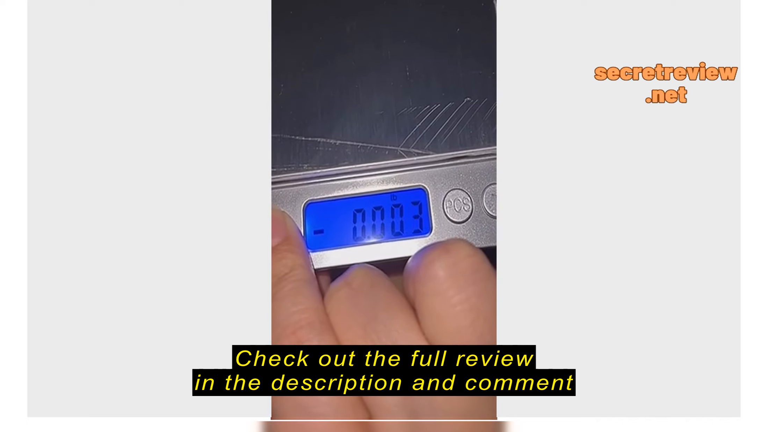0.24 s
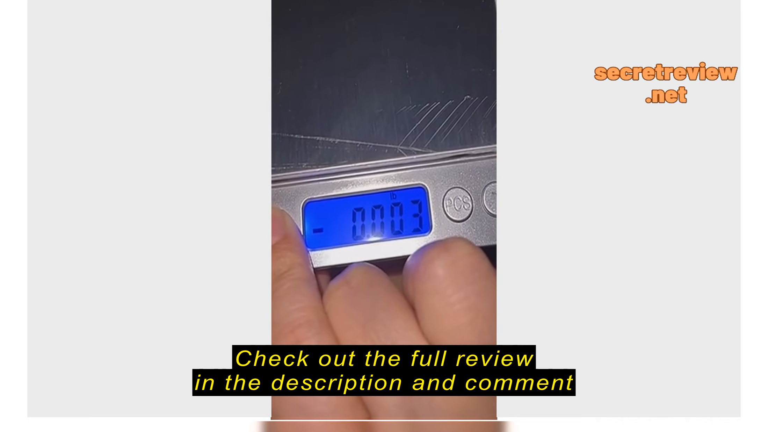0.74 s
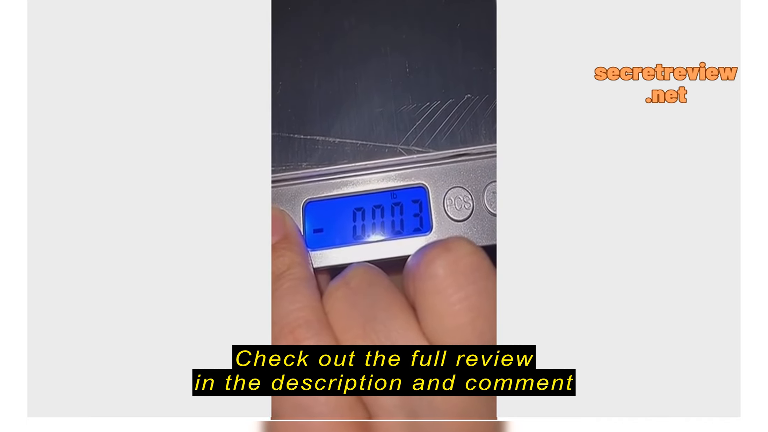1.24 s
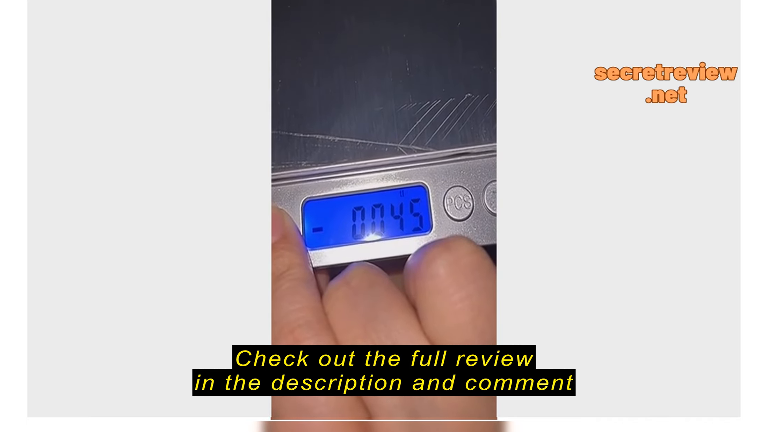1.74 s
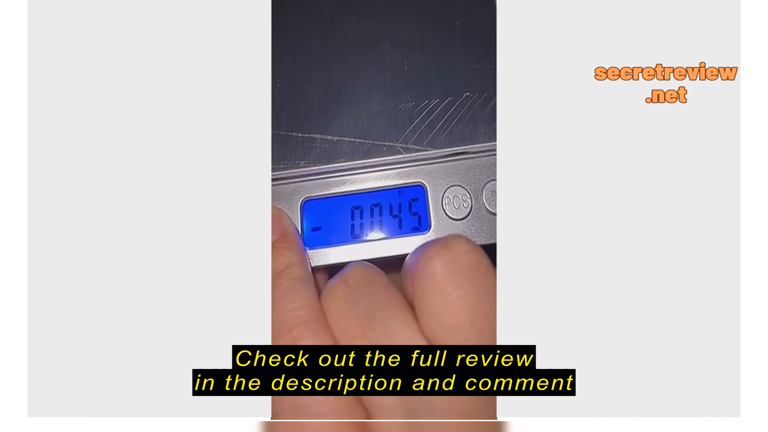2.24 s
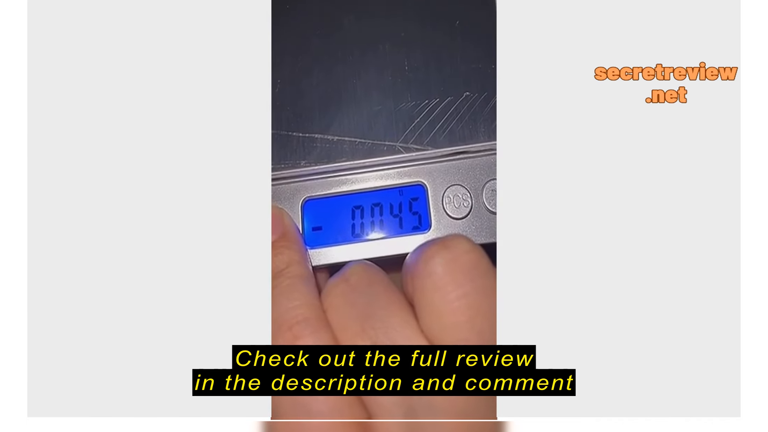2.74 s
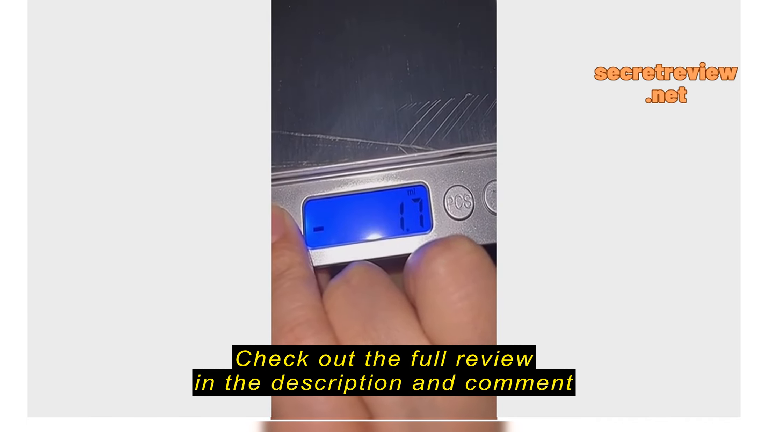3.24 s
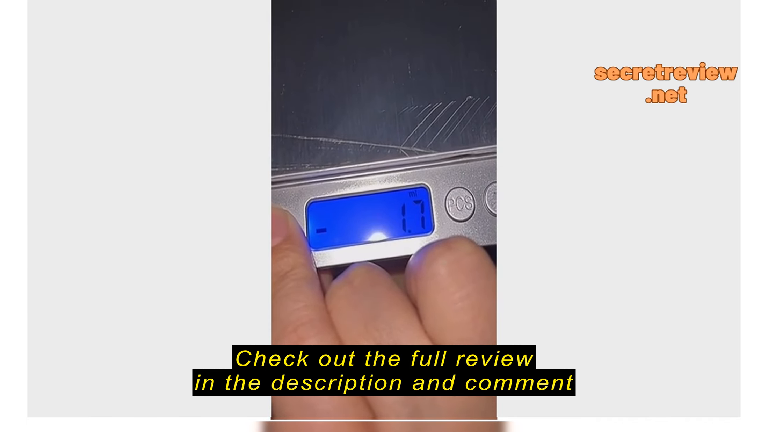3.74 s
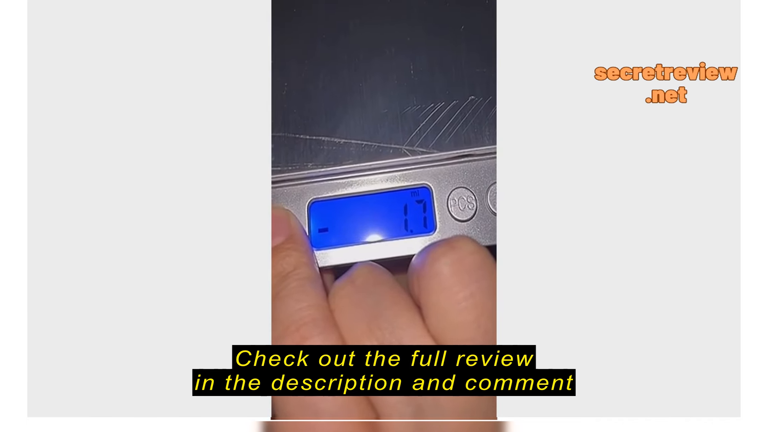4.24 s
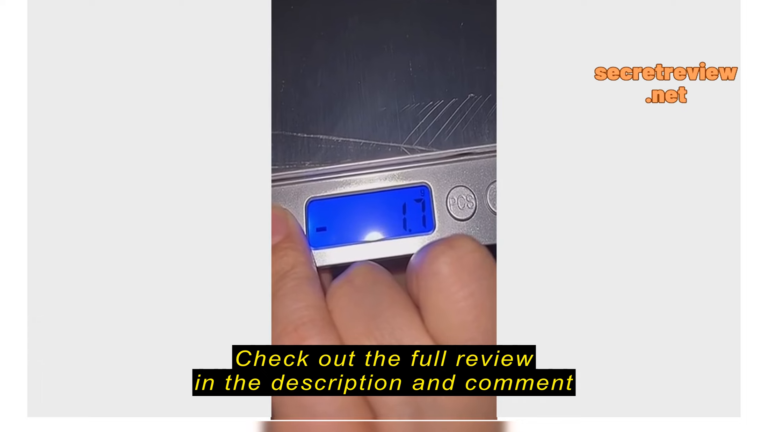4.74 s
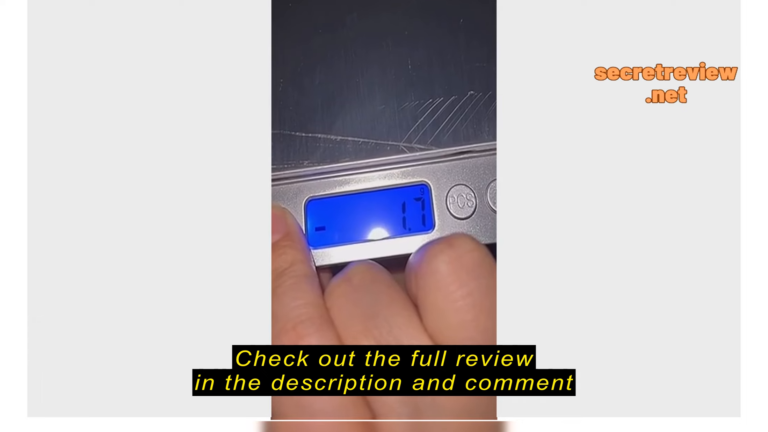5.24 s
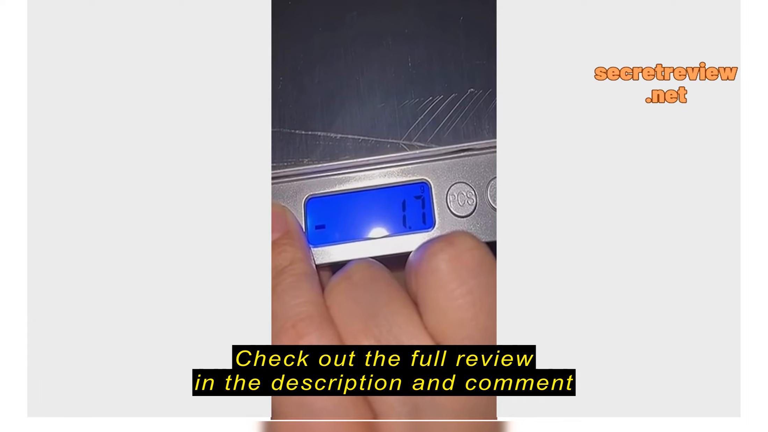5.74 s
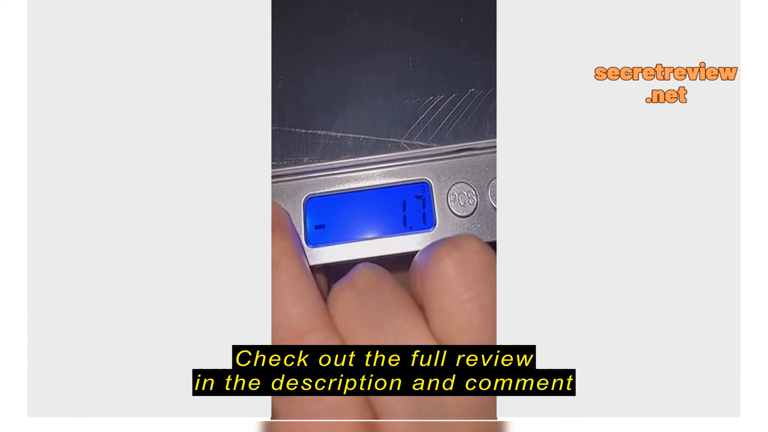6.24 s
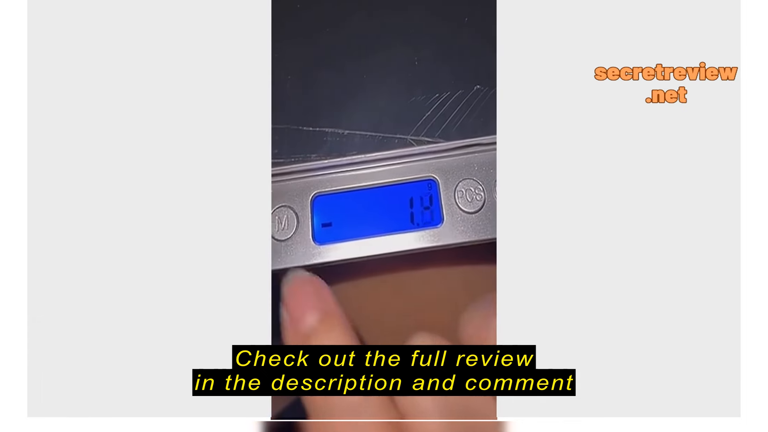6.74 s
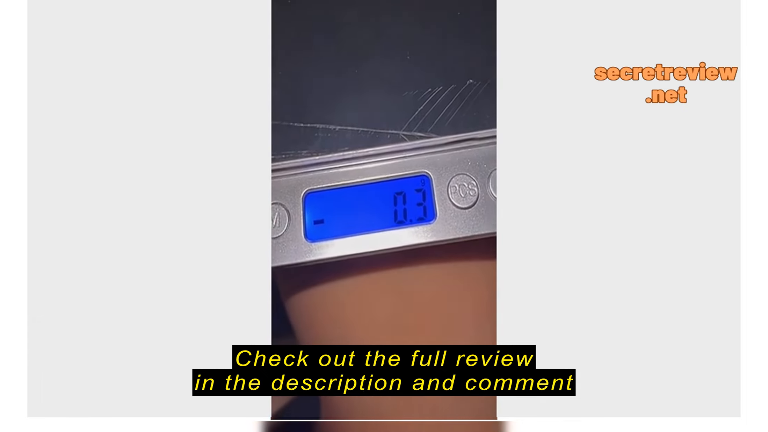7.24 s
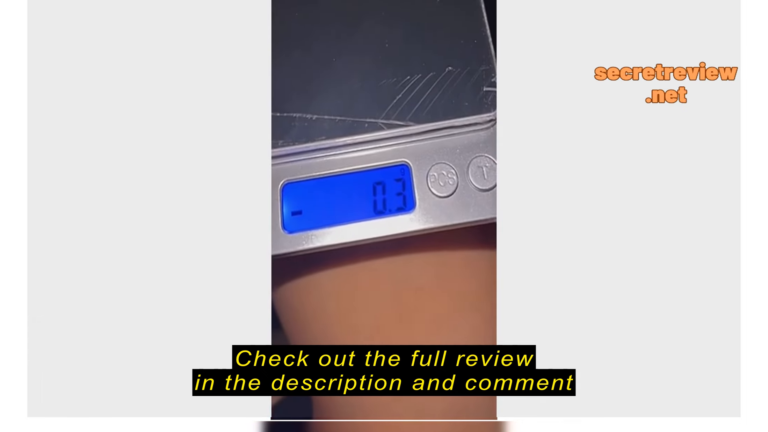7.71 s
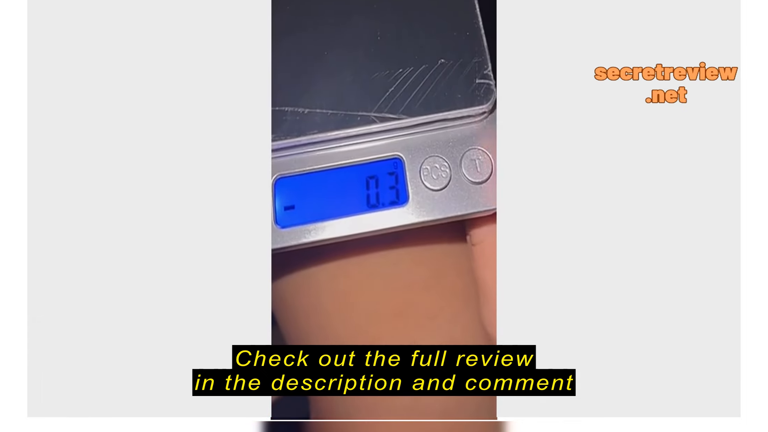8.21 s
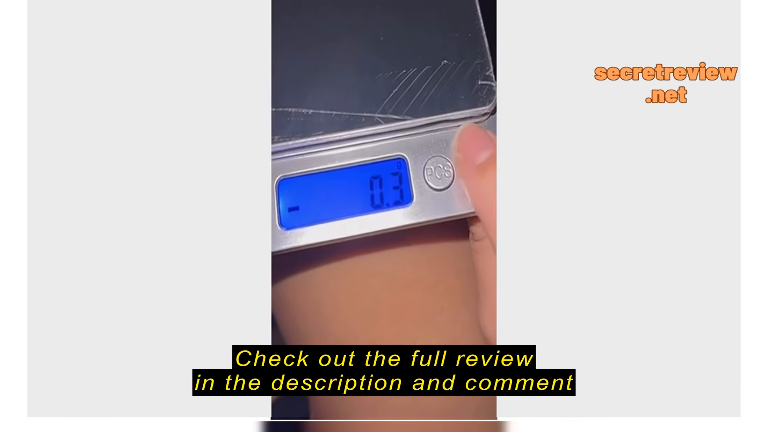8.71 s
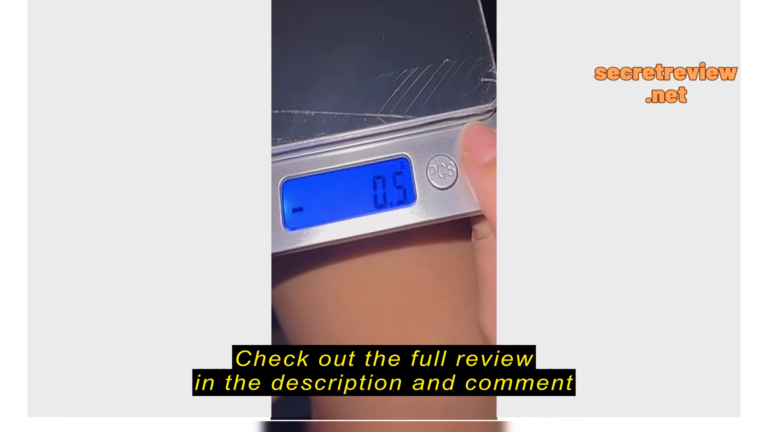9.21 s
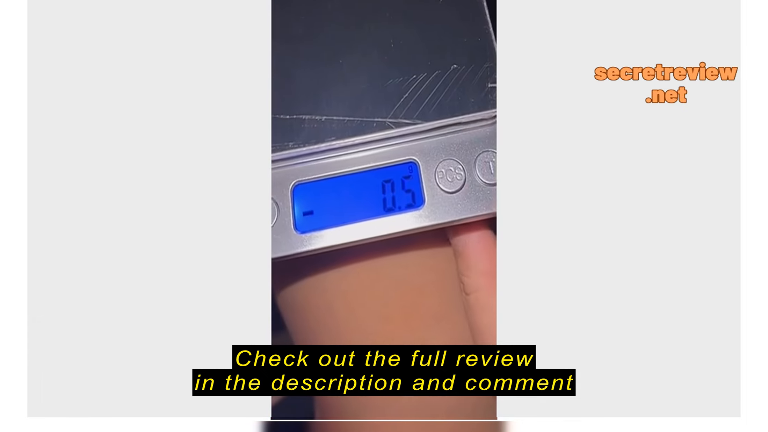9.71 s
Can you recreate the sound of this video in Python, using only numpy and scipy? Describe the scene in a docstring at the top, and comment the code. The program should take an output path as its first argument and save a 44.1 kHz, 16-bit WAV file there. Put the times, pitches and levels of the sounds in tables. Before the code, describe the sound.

A quiet room with soft low rumble, light steady hiss, wavering low hum and a barely perceptible high whine. For over a second nothing else happens. At 1.3 s a scale button is pressed very close by: a sharp, bright snap of a small metal dome in a damped case. At 1.55 s it springs back with a hollower click, capped by a tiny hard plastic tick. Similar press and release pairs follow at 3.0 and 3.3, 4.7 and 5.1, 6.5 and 6.8, and 8.2 and 8.55 s, similar in strength, with small changes in brightness; the pair around 6.5 is duller, the press at 8.2 brighter. A final press snaps at 9.9 s, without its release. Each click is only milliseconds long, with a minute squeak before it, a faint low knock, a slight steel pan ring and a short diffuse room tail.

```python
"""Kitchen scale buttons, close by

A quiet room, a phone close to a digital kitchen scale, and a thumb working its small buttons.
A metal dome snaps in on each press, bright, and back on each release, hollower; both ring the same damped case.
Each snap is a noise squeak, a noise crack, ringing modes and a low knock, answered by the steel pan and the room.
A plastic cap ticks once; beneath lie filtered-noise rumble and hiss, two low hums and a very faint high whine."""
import sys
import numpy as np
from scipy import signal
from scipy.fft import rfft, irfft
from scipy.io import wavfile
from scipy.ndimage import uniform_filter1d

SR = 44100
rng = np.random.default_rng(int(sys.argv[2]) if len(sys.argv) > 2 else 0)


def store_pcm(level_fs):
    """Save levels as 16-bit WAV."""
    pcm = np.round(np.clip(level_fs, -1, 1) * 32767).astype(np.int16)
    wavfile.write(sys.argv[1], SR, np.atleast_2d(pcm).T)


N = 439662


def undb(db):
    """Decibels to gain."""
    return 10 ** (np.asarray(db) / 20)


def along(hz, points, column=1):
    """Read a column of a table on a log-frequency axis."""
    points = np.asarray(points, float)
    return np.interp(np.log(np.maximum(hz, 1)), np.log(points[:, 0]), points[:, column])


def noise(colour, size):
    """Noise of rms 1 with a (pitch_hz, level_db) colour."""
    hz = np.fft.rfftfreq(size, 1 / SR)
    x = irfft(rfft(rng.standard_normal(size)) * undb(along(hz, colour)), size)
    return x / x.std()


def swell(t, peak_s):
    """Vibration envelope that builds up, reaches 1 at peak_s and is quickly damped by the hand."""
    u = np.maximum(t, 0) / peak_s
    return u * np.exp((1 - u ** 2) / 2)


def add(out, sound, start_s):
    """Mix a stereo sound in at a given time."""
    start = int(start_s * SR)
    out[:, start:start + sound.shape[1]] += sound[:, :N - start]


# Colour of the room rumble, the same at both microphone ports: pitch_hz, level_db (relative, per Hz)
RUMBLE_COLOUR = [(20, -31.5), (34, -23.5), (45, -7.5), (54, 1.5), (76, -0.5), (92, -5.5), (150, -6.5),
                 (178, -11.5), (240, -11), (400, -17), (650, -25.5), (1300, -37.5), (3000, -64),
                 (8000, -87)]
# Colour of the steady hiss, the same at both ports: pitch_hz, level_db (relative, per Hz)
HISS_COLOUR = [(300, -8), (900, 3), (1500, 0), (2450, -0.5), (2950, -7.5), (3300, -6), (4500, -7.5),
               (5050, -12.5), (5750, -8.5), (6900, -14.5), (9700, -15.5), (12500, -27), (14300, -24.5),
               (15600, -44)]


def rumble_and_hiss(rumble_db=-49.5, hiss_db=-66.5):
    """Steady coloured noise common to both ports, each layer set by its rms level."""
    return undb(rumble_db) * noise(RUMBLE_COLOUR, N) + undb(hiss_db) * noise(HISS_COLOUR, N)


# Faint unsteady tones, two low hums and a high whine: pitch_hz, width_hz, level_db (rms)
HUM_TONES = [(74, 3, -60), (241, 6, -68.5), (9790, 25, -95)]


def hums():
    """Narrow bands of noise, heard as tones that waver in level."""
    freqs = np.fft.rfftfreq(N, 1 / SR)
    total = np.zeros(N)
    for pitch_hz, width_hz, level_db in HUM_TONES:
        resonance = 1 / (1 + ((freqs - pitch_hz) / width_hz) ** 2)
        tone = irfft(rfft(rng.standard_normal(N)) * resonance, N)
        total += undb(level_db) * tone / tone.std()
    return total


# Colour of the background that differs between the ports: pitch_hz, level_db (relative, per Hz)
DIFFUSE_COLOUR = [(25, -27.5), (52, -6.5), (75, -9), (250, 0), (700, 1.5), (1400, -6), (1800, -23.5),
                  (2600, -11.5), (3900, -24), (5800, -21), (9500, -23), (12500, -35.5), (14500, -30),
                  (15600, -55)]


def background(diffuse_db=-63.5):
    """Rumble, hiss and hums common to both ports, plus diffuse noise in opposite phase at each."""
    mid = rumble_and_hiss() + hums()
    side = undb(diffuse_db) * noise(DIFFUSE_COLOUR, N)
    return np.array([mid + side, mid - side])


# Room reflections by band: pitch_hz, level_db (relative), t60_s
ROOM_BANDS = [(300, -24.5, .35), (750, -15.5, 0.4), (1200, -18, 0.32), (2200, -18.5, 0.43),
              (4000, -19, .41), (7200, -15.5, .38), (10000, -13, .35), (15000, -30.5, .2)]


def room(snap, walls, first_s=0.0039, early_db=1, early_s=0.016, width=0.66, blur_hz=900, direct_share=.3):
    """Dense reflections: early ones from the desk and hand, then the walls, dying away band by band."""
    size = walls.shape[1]
    t = np.arange(size) / SR
    hz = np.fft.rfftfreq(size, 1 / SR)
    # the walls hear the case from all sides, which fills the gaps between its modes
    power = abs(rfft(snap.mean(0), size)) ** 2
    blurred = abs(uniform_filter1d(power, int(blur_hz / hz[1])))
    all_round = blurred * np.minimum(hz / blur_hz, 1) ** 2
    spectra = np.sqrt(direct_share * power + (1 - direct_share) * all_round) * rfft(walls)
    build_up = 1 - np.exp(-(t / first_s) ** 2)
    onset = build_up * (1 + undb(early_db) * np.exp(-t / early_s))
    centres, tail = np.array(ROOM_BANDS)[:, 0], 0
    # each band fades into its neighbours
    for (_, level_db, t60_s), weights in zip(ROOM_BANDS, np.eye(len(ROOM_BANDS))):
        fade = onset * np.exp(-np.log(1000) * t / t60_s)
        band = irfft(spectra * along(hz, np.c_[centres, weights]), size)
        tail = tail + undb(level_db) * band * fade / np.linalg.norm(fade)
    mid, side = tail
    return np.array([mid + width * side, mid - width * side])


# Lightly damped modes of the steel weighing pan: pitch_hz, level_db (gain at resonance), t60_s
PAN_MODES = [(765, -9, .28), (1070, -7, .28), (1173, -9, .33), (1485, -5, .22), (1680, -11, .22),
             (2020, -10, .28), (3550, -5.5, .22), (4520, -9, .25), (8700, -5, .2)]


def pan_ring(snap):
    """The steel pan's resonances pick up the snap and sing on faintly."""
    t = np.arange(SR // 2) / SR
    pitch_hz, level_db, t60_s = np.transpose(PAN_MODES)[:, :, None]
    damping = np.log(1000) / t60_s
    gain = undb(level_db) * 2 * damping / SR
    modes = gain * np.exp(-damping * t) * np.sin(2 * np.pi * pitch_hz * t)
    return signal.fftconvolve(snap, modes.sum(0)[None], axes=1)


# The loose plastic cap slaps its rim: start_s, level_db
CAP_SLAPS = [(1.5686, -15)]


def cap_ticks(peak_s=.0001):
    """A hard, very short tick of plastic on plastic: a burst of noise, different at each port."""
    out, t = np.zeros((2, N)), np.arange(SR // 100) / SR
    colour = [(1000, -20.5), (4000, -8), (8500, 1), (11000, -2), (13000, -9.5), (16000, -13)]
    for start_s, level_db in CAP_SLAPS:
        burst = np.array([noise(colour, len(t)) for _ in range(2)])
        add(out, undb(level_db) * swell(t, peak_s) * burst, start_s)
    return out


def thumb_knock(t, pitch_hz=430, peak_s=0.0029):
    """The whole scale nods briefly under the thumb, a short damped sine."""
    return swell(t, peak_s) * np.sin(2 * np.pi * pitch_hz * t)


def dome_squeak(t, pitch_hz, ahead_s=.0018, length_s=0.0013, width_hz=700):
    """Just before it snaps, the dome slips on its contact: a tiny band of noise."""
    band = 1 / (1 + ((np.fft.rfftfreq(len(t), 1 / SR) - pitch_hz) / width_hz) ** 2)
    rub = irfft(rfft(rng.standard_normal((2, len(t)))) * band, len(t))
    return np.exp(-((t + ahead_s) / length_s) ** 2) * rub / rub.std()


def dome_crack(t, peak_s=.0017, rise_s=.0012, fall_s=0.0018):
    """The metal dome gives way ever faster, then buckles: dense treble noise, different at each port."""
    colour = [(700, -25), (1500, -10), (4000, -1.5), (7000, -5),
              (10800, 0), (12200, -17.5), (15000, -23.5), (16500, -28)]
    shape = np.exp(np.minimum((t - peak_s) / rise_s, (peak_s - t) / fall_s))
    return shape * np.array([noise(colour, len(t)) for _ in range(2)])


# Modes of the hand-damped case: pitch_hz, peak_s (time to full swing), press_level_db, release_level_db
CASE_MODES = [(646.0, 0.0053, -52, -38.5), (768, 0.0048, -37, -25.5), (1069, 0.003628, -25.0, -18),
              (1147, 0.004044, -24.5, -16.5), (1270, 0.0038, -33.5, -30), (1488.0, 0.0032, -25.6, -27),
              (1680, 0.0018, -19.5, -26), (1993, 0.0028, -20.5, -21.5), (2260, 0.0025, -25, -34.5),
              (2501.0, 0.0022, -23, -27.5), (2812.0, 0.0028, -29.5, -33), (3475, 0.0019, -17.5, -23.5),
              (3820, 0.0027, -24.5, -31), (4555, 0.0015, -19, -28.5), (5576, 0.0012, -19, -27.5),
              (5872.0, 0.0014925, -19.5, -26), (6640.0, 0.0013, -24.5, -28.5), (7250, 0.0017, -22.5, -20),
              (7940, 0.0012, -29, -28.5), (8845, 0.0012, -25.5, -30.5), (9602.0, 0.001, -28, -29),
              (10458.0, 0.001, -31, -30.5)]
# Phase by which the left microphone port leads the right: pitch_hz, lead_rad
PORT_LEAD = [(600, 0.23), (1200, 0.53), (2300, -0.11), (2760, 1.1), (3200, 0.23), (4200, .1), (6500, -1.1),
             (11000, -1.4)]


def case_ring(t, mode_db, treble_db, treble_hz=5000, scatter_db=0.74, detune=.002):
    """The snap spreads through the case as bending waves; the slow, low ones tend to crest last."""
    pitch_hz, peak_s = np.transpose(CASE_MODES)[:2]
    treble = 1 / (1 + (treble_hz / pitch_hz) ** 4)
    # the thumb never sits the same way twice, which mostly changes the high modes
    scatter = scatter_db * rng.standard_normal(len(pitch_hz))
    gain = undb(mode_db + treble * (treble_db + scatter))
    detuned_hz = pitch_hz * (1 + detune * rng.standard_normal(len(pitch_hz)))
    phase = 2 * np.pi * detuned_hz[:, None] * (t - peak_s[:, None])
    half_lead = along(pitch_hz, PORT_LEAD)[:, None] / 2
    swing = gain[:, None] * swell(t, peak_s[:, None])
    return np.array([(swing * np.sin(phase + side * half_lead)).sum(0) for side in (1, -1)])


def buttons(snaps, mode_db, walls, stroke_db, squeak_hz, knock_db):
    """Each snap is a squeak, a crack, the ring of the case and a soft knock, answered by pan and room."""
    lead_s = .01  # room for the squeak ahead of the snap
    out, t = np.zeros((2, N)), np.arange(SR // 20) / SR - lead_s
    for start_s, treble_db, squeak_db in snaps:
        crack_db = -23.7 + .6 * treble_db  # a brighter snap cracks harder
        dome = undb(squeak_db) * dome_squeak(t, squeak_hz) + undb(crack_db) * dome_crack(t)
        body = case_ring(t, mode_db, treble_db) + undb(knock_db) * thumb_knock(t)
        snap = undb(stroke_db) * (dome + body)
        add(out, snap, start_s - lead_s)
        add(out, pan_ring(snap), start_s - lead_s)
        add(out, room(snap, walls), start_s)
    return out


# Dome springing back: start_s, treble_db, squeak_db (both before the common stroke level)
RELEASE_SNAPS = [(1.5646, 3, -24.5), (3.2853, -0.5, -28), (5.0827, -4.5, -32), (6.7957, -5, -34),
                 (8.5623, -2.5, -34)]


def releases(walls):
    """The dome springs back at a fixed force, so all releases share one strength and squeak pitch."""
    release_db = np.transpose(CASE_MODES)[3]
    return buttons(RELEASE_SNAPS, release_db, walls, stroke_db=-.1, squeak_hz=6500, knock_db=-41)


# Dome snapping in: start_s, treble_db, squeak_db (both before the common stroke level)
PRESS_SNAPS = [(1.3058, -1.5, -42), (2.9835, -2.5, -30.5), (4.7342, -0.5, -28), (6.4719, -5, -24),
               (8.2420, 1.5, -32.5), (9.9357, -1, -43)]


def presses(walls):
    """The dome buckles at a fixed force, so all presses share one strength and squeak pitch."""
    press_db = np.transpose(CASE_MODES)[2]
    return buttons(PRESS_SNAPS, press_db, walls, stroke_db=.15, squeak_hz=5750, knock_db=-45.5)


def scene():
    """Presses and releases in the quiet room; scale and phone stay put, so all share one reflection pattern."""
    walls = rng.standard_normal((2, SR // 2))
    return background() + cap_ticks() + releases(walls) + presses(walls)


def record(dry, top_hz=16450):
    """The phone cuts the top of the treble with a steep low-pass."""
    low_pass = signal.ellip(8, .2, 70, top_hz, fs=SR, output="sos")
    return signal.sosfilt(low_pass, dry)


dry = scene()
out = record(dry)
store_pcm(out)
```